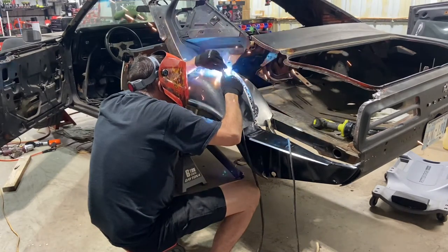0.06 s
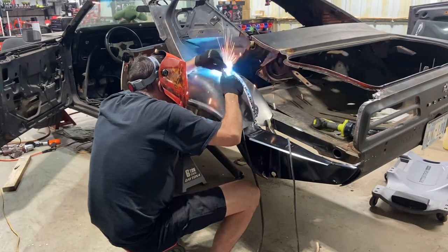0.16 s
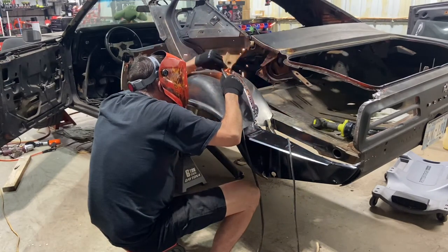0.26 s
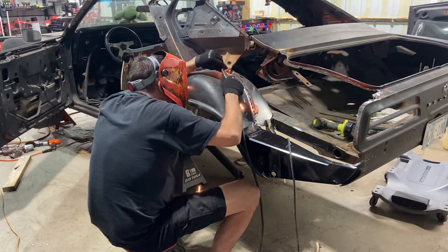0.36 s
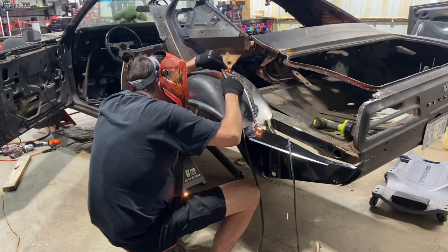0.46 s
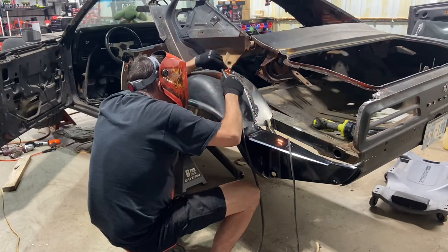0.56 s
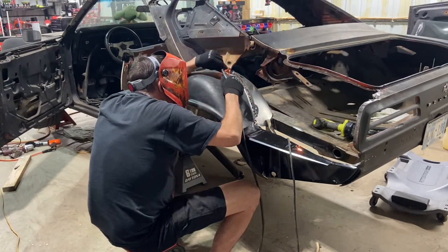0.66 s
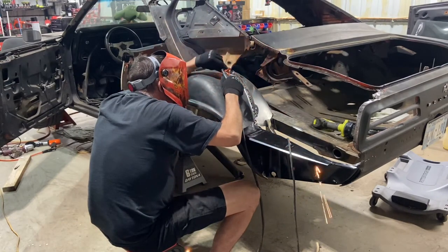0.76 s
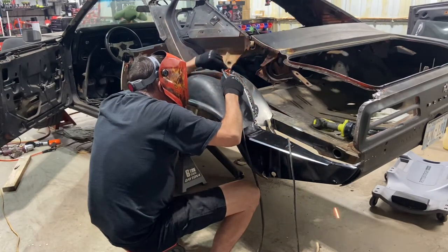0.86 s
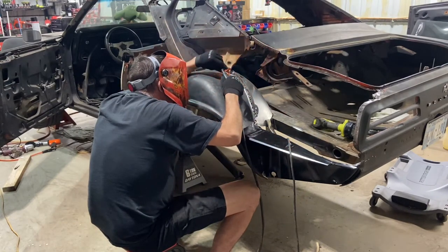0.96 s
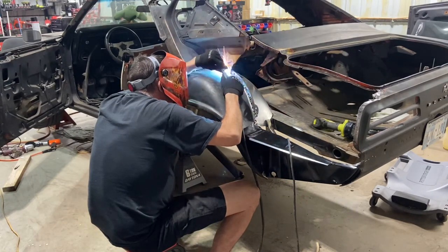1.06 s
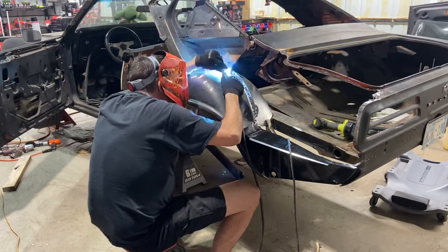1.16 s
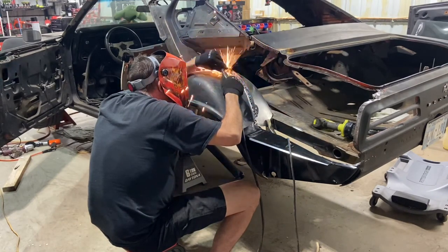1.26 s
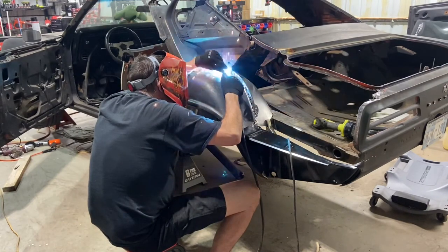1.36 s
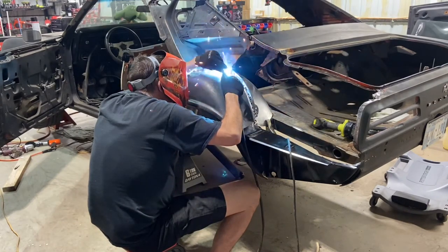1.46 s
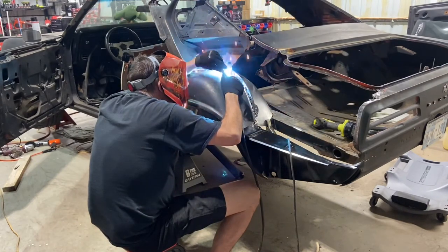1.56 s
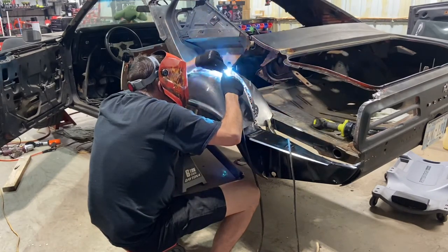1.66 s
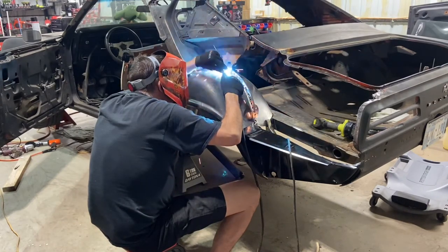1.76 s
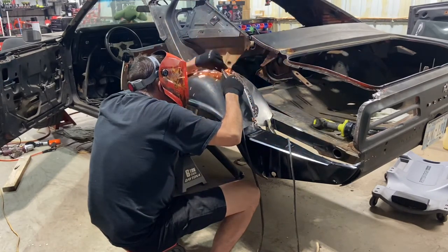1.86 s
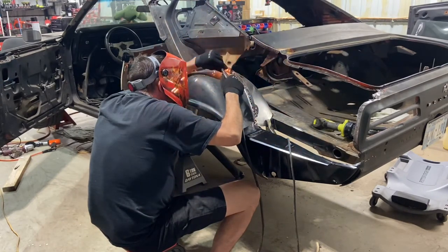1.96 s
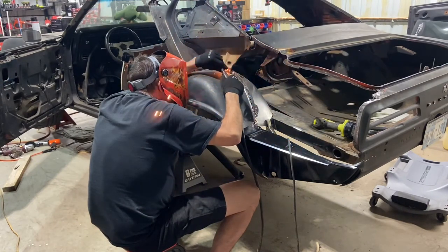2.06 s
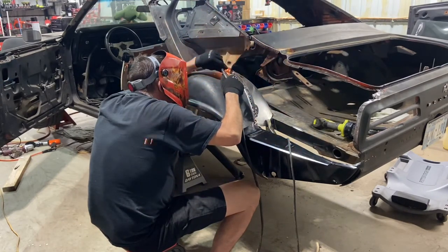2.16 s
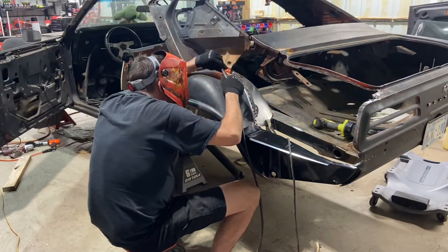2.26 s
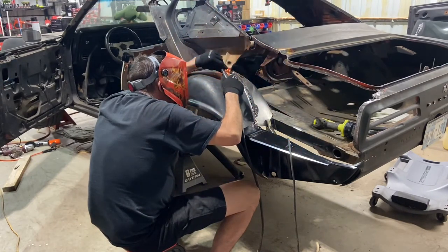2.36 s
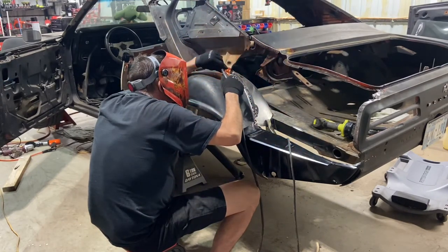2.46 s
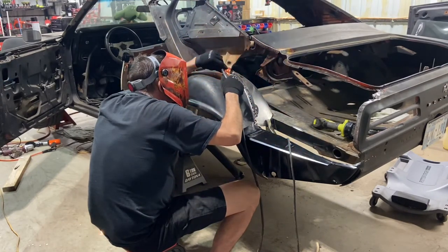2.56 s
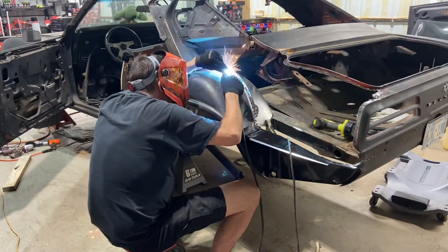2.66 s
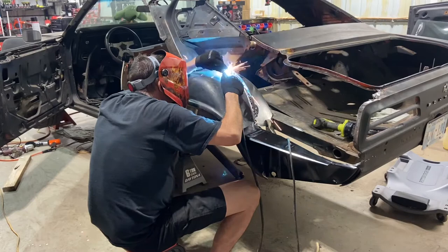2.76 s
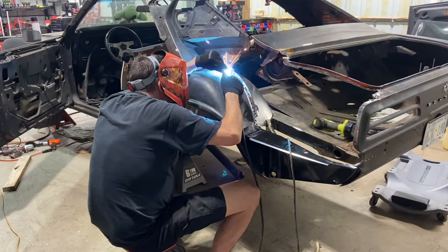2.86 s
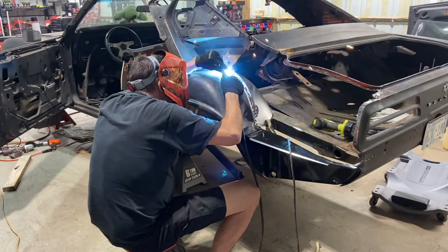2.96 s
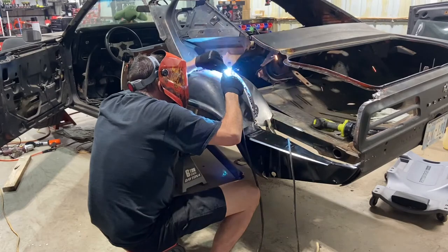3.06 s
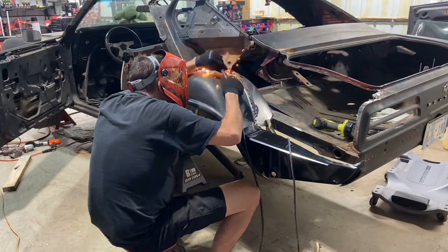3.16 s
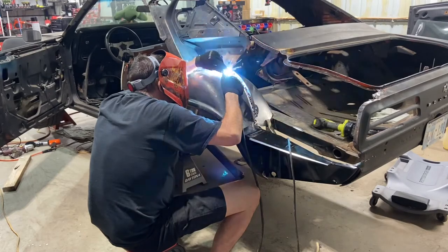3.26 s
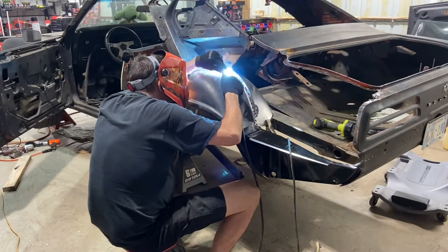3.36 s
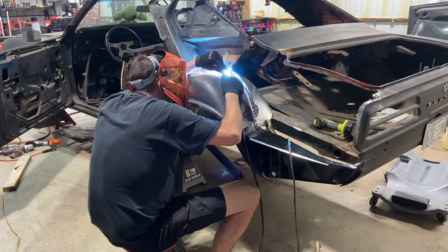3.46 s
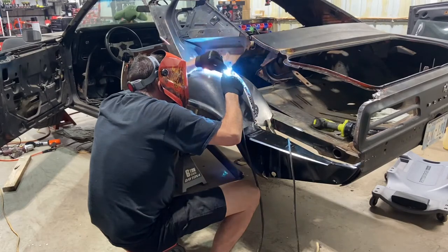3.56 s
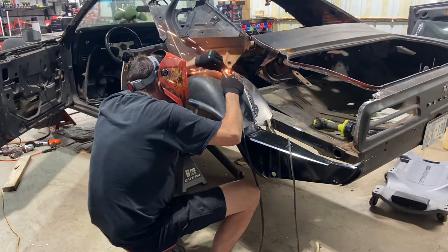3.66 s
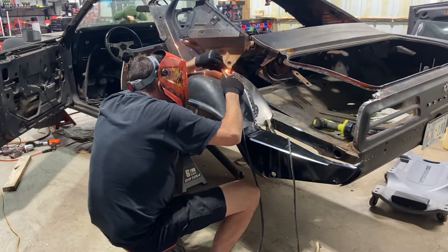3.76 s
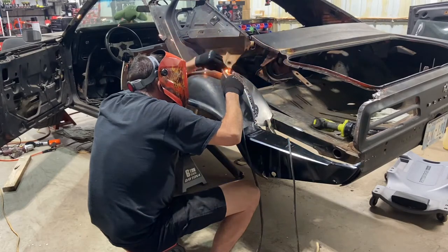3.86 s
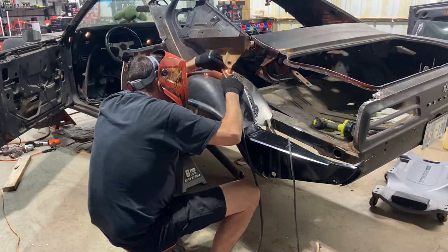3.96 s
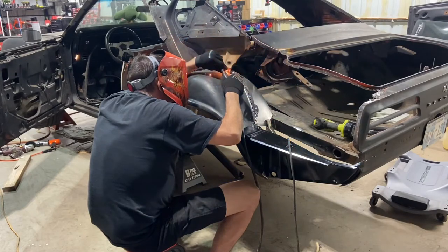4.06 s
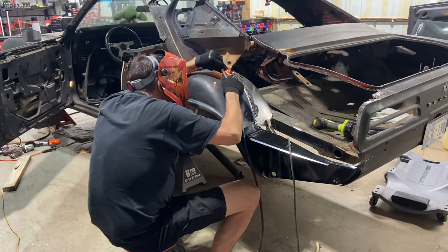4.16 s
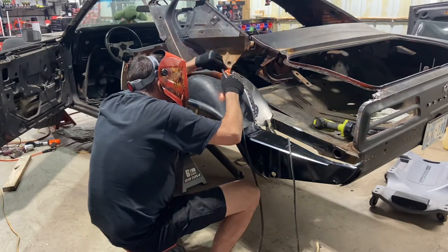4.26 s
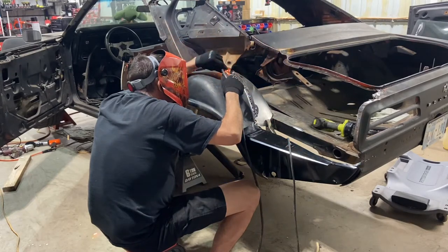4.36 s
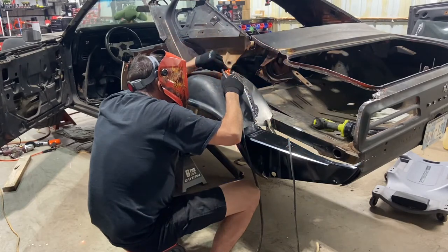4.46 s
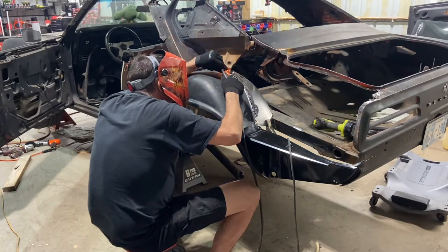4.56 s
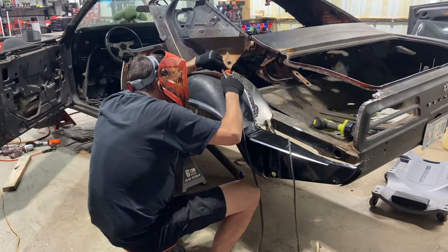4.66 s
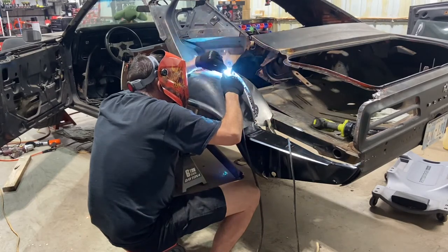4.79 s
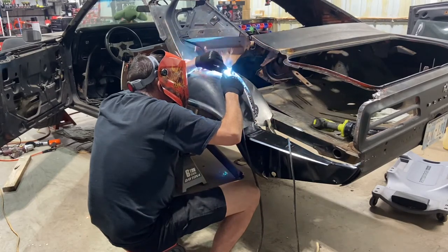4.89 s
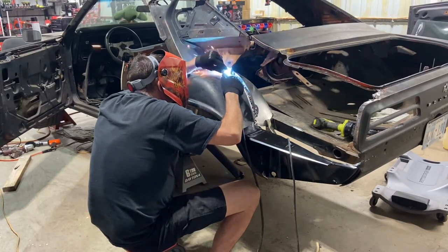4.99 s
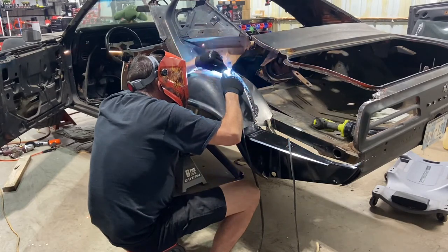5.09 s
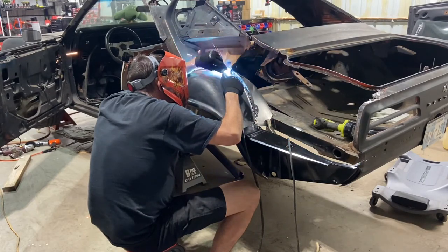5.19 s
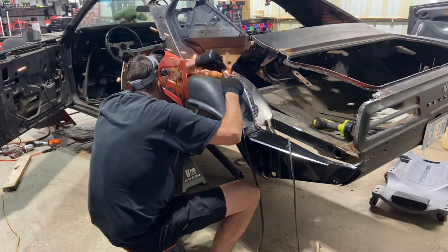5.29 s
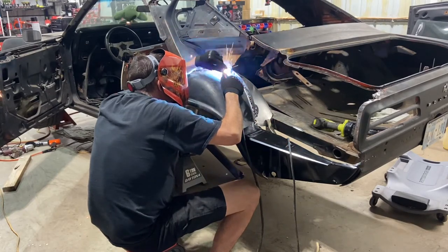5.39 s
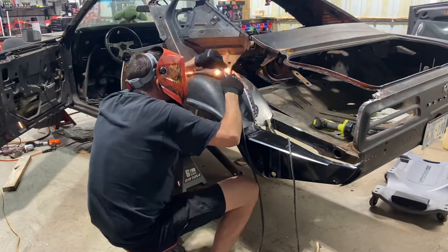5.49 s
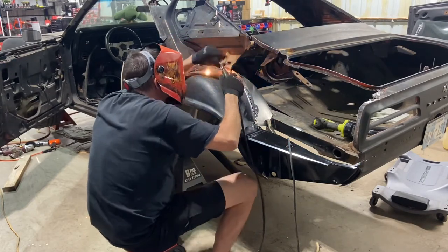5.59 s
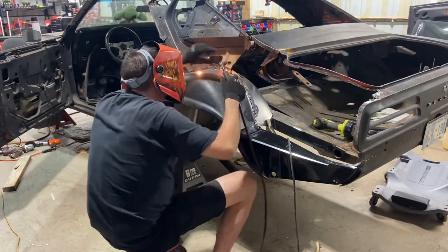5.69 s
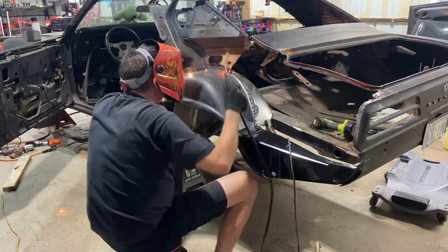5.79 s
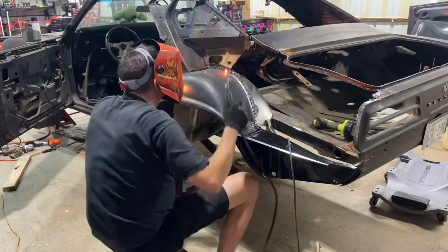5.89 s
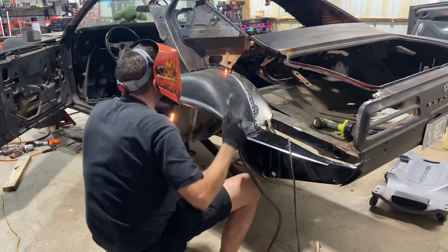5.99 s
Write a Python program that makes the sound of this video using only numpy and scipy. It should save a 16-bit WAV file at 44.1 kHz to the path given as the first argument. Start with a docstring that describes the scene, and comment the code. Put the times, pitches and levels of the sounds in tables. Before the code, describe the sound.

A large, live metal workshop heard from about two metres, with a steady low fan drone around 250 Hz, soft air rush and faint transformer hum throughout. At 0 s a weld is just ending, its echo decaying; a single snap at 0.15 s. Quiet hum until a short squeaky tick at 1.0 s and a puff of gas, then from 1.05 to 1.8 s a harsh buzzing crackle, about 75 snaps a second, with uneven loud pops, fizz and steel thuds. The hall tail fades. Another tick at 2.57 s starts a longer, fiercer weld from 2.63 to 3.57 s, the panel booming. A faint pop near 4 s. A third tick at 4.69 s, weld from 4.73 to 5.28 s with heavy low thuds, then a brief zap at 5.36 to 5.4 s. Echo dies away; from 5.7 s cloth rubs softly, with light knocks at 5.75 and 5.95 s, ending around 6 s.

```python
"""Short MIG welds on a bare car body in a steel-walled workshop, heard from about two metres.
The wire strikes, then shorts and bursts some 75 times a second: each burst cracks, shakes the sheet steel and fills the hall.
Spatter fizzes between the bursts and the hot panel thuds; a cooling fan, slowing under each weld, and the transformer hum throughout.
The welder shifts position at the end."""
import sys
import numpy as np
from scipy import signal
from scipy.fft import rfft, irfft, next_fast_len
from scipy.io import wavfile

SR = 44100
rng = np.random.default_rng(int(sys.argv[2]) if len(sys.argv) > 2 else 0)


def pcm_store(signal):
    """Save signal as 16-bit PCM."""
    levels = np.round(np.clip(np.atleast_2d(signal), -1, 1) * 32767)
    wavfile.write(sys.argv[1], SR, levels.astype(np.int16).T)


N = 265910

# loud pops, where the wire stubs and blows clear: (s, level dB)
POPS = [(0.1519, -6.5), (1.0578, -6), (1.0795, -11), (1.1056, -7), (1.1366, -15), (1.1676, -11.5), (1.1797, -8),
        (1.2121, -13), (1.2352, -13.5), (1.2491, -3), (1.2985, -5.5),
        (1.333, -7), (1.3457, -5), (1.3581, -5), (1.3866, -8), (1.4645, -10), (1.5081, -12.5),
        (1.5296, -10.5), (1.566, -14), (1.5799, -7), (1.5984, -10.5),
        (1.6135, -3.5), (1.6343, -7), (1.6489, -5), (1.711, -7), (1.724, -7), (1.743, -4.5), (1.7652, -6),
        (1.7844, -12), (1.799, -13), (2.578, -11.5), (2.646, -5),
        (2.6571, -5.5), (2.6802, -3), (2.7024, -3), (2.7161, -8), (2.7523, -10), (2.7768, -7), (2.79, -7),
        (2.805, -9.5), (2.819, -5), (2.8985, -12), (3.0073, -11), (3.0205, -9.5), (3.0375, -14.5),
        (3.0829, -6.5), (3.1109, -6.5), (3.1397, -7.5), (3.1718, -6.5),
        (3.217, -8), (3.2458, -9), (3.2564, -6.5), (3.309, -8.5), (3.3325, -10), (3.3441, -8), (3.3561, -6),
        (3.4015, -8), (3.4281, -8), (3.4478, -9),
        (3.465, -7.5), (3.4748, -6), (3.513, -10), (3.5255, -7.5), (3.5385, -9), (3.5771, -9.5), (3.6102, -9),
        (3.9878, -12.5), (4.697, -4), (4.7375, -8), (4.7634, -7.5), (4.7784, -6.5), (4.7916, -7.5),
        (4.803, -10.5), (4.814, -10), (4.8271, -12), (4.8398, -7), (4.8534, -11), (4.869, -7.5),
        (4.8927, -7), (4.9047, -10.5), (4.9179, -9), (4.9314, -11.5), (4.9589, -8.5), (4.9725, -6.5),
        (5.0071, -6.5), (5.0219, -9), (5.0732, -11.5), (5.0912, -14), (5.108, -9),
        (5.123, -8), (5.142, -8.5), (5.1763, -6.5), (5.2459, -11), (5.2788, -9.5), (5.3553, -6), (5.3916, -7.5)]
# the cold wire stubs on the steel before each arc: (s, level dB, build-up of the skid s, pitch of its lower squeak Hz, lower squeak dB, upper squeak dB, surge of gas dB)
STRIKES = [(1.0082, 1.5, 0.0015, 3750, -2, -4, 3.5), (2.5737, 3, 0.0016, 4180, -12, -1.5, 6), (4.6908, 0, .003, 3380, -2.5, -6, 6)]
# the arc burns, for a whole weld or a brief dab: (catches s, goes out s, level dB, shaking of the panel dB)
WELDS = [(-.5, 0.039, 4, -4), (0.146, 0.17, -2.5, 2.5), (1.05, 1.798, -4.8, 0), (2.627, 3.571, -0.5, 1.5), (4.732, 5.278, 0.6, 0.5), (5.36, 5.404, 4, 1)]
# light knocks of the torch and the welder's body: (s, level dB)
KNOCKS = [(5.745, -30), (5.935, -24), (5.972, -21)]
# colours: (Hz, dB per Hz)
CRACK = [(200, -19), (600, -28), (1000, -12.5), (1700, -16.5), (2100, -1.5), (2600, -6), (3300, -2.5), (4700, -1), (5800, -3), (7200, 0.76), (10500, -1.5), (13500, -1.5), (15500, -5.5)]
HALL = [(150, -2), (500, -4.5), (1000, 3), (1500, 3), (2600, 1), (4500, -0.5), (7000, 2.5), (9000, -2.5), (11000, 3), (13500, 0.5), (15500, -1)]
KNOCK = [(100, -17), (450, 10), (900, -5.5), (2000, -5), (5000, -10.5), (14000, -23)]
SHOP = [(25, -33.5), (45, -18), (70, -1), (105, -9.5), (145, -6), (170, 2.5), (210, 1.5), (236, 7.5), (259, -2.5), (277, 6), (300, -4), (340, -9.5), (420, -13), (600, -14), (1200, -17.5), (2500, -24.5), (6000, -36), (9000, -42), (15000, -65)]
# reverberation of the hall: (Hz, t60 s)
HALL_T60 = [(100, 0.65), (500, 1.24), (1400, 0.98), (3700, 1.33), (7000, 1.03), (10000, 0.57), (15000, 0.36)]
# the sheet steel: (Hz, t60 s, dB)
PANEL_FLEX = [(55.7, 0.2, -15.5), (72.9, 0.38, 0), (124, 0.68, 1), (166.2, 0.33, 3.5), (195, 0.13, 5), (231, 0.2, 4.5), (280.5, 0.19, 2), (360.2, 0.3, -2.5), (408, 0.11, -18.5), (494, 0.05, -24), (605, 0.12, -4)]
PANEL_RING = [(716, 0.078, -23.5), (873, 0.089, -6.5), (968, 0.36, -9.5), (1015, 0.19, -9.5), (1160, 0.03, -10.5), (1396, 0.023, -2.5), (1493, 0.06, -4), (2130, 0.05, -7.5), (2304, 0.062, 1), (3000, 0.26, -21.5), (3190, 0.12, -6)]
# the ring of the struck wire: (Hz, t60 s, dB)
WIRE_RING = [(1480, .03, -4), (2272, 0.03, -12), (3630, 0.007, 0), (3760, 0.04, -1), (4300, 0.006, 1), (5250, .006, 1), (6890, .008, 0)]  # fixed
# tones of the fan: (multiple of the blade rate, dB rms)
FAN = [(1, -43), (2, -57.5), (3, -67.5), (5, -65.5), (6, -70.5)]
# hum of the transformer: mains frequency (Hz) and level (dB rms)
MAINS_HZ = 60  # fixed
HUM_DB = -63.5

# the fan slows while the arc loads the supply: (blade rate at rest Hz, sag under load Hz, lag of the rotor s)
FAN_HZ, FAN_SAG_HZ, FAN_LAG_S = 249.4, 3.7, .13  # fixed
LEAD = SR // 2  # fixed
M = N + 2 * SR  # fixed
TIME = (np.arange(M) - LEAD) / SR
PORT_LAG = 10  # fixed
TOP_HZ = 16000  # fixed
# the welder leans back, clothes and glove rubbing: (s, level dB)
SHUFFLE = [(5.701, -93), (5.75, -75), (5.79, -65), (5.90, -61), (5.94, -59), (5.98, -60), (6.04, -48.5)]
# the heated panel buckles with a deep thud: (s, level dB, length of the push s)
THUDS = [(1.084, -48, .003), (1.37, -47, .004), (1.69, -42, 0.0044), (1.76, -43, 0.0037), (1.821, -41, 0.0032), (2.656, -43, 0.0032), (2.799, -45, .008), (2.889, -49, 0.0045), (3.187, -42, 0.0043), (3.219, -40, 0.0048), (3.259, -38, 0.0028),
         (3.354, -33.5, 0.0082), (3.452, -46, 0.0058), (4.733, -39, 0.0031), (4.766, -38.5, .004), (4.816, -34, 0.0041), (4.869, -34, 0.0072), (4.917, -40, 0.0031), (4.989, -35, 0.0089)]
# modes of the buckling panel: (Hz, t60 s, dB)
BUCKLE = [(48.3, 0.089, -1), (64, 0.066, 3.5), (86, 0.053, 5.5), (122.6, 0.057, 17), (164, .035, 15)]
# strength of the arc through the three long welds: (s, dB)
ARC_STRENGTH = [(1.07, -28.5), (1.15, -24.5), (1.22, -22.5), (1.259, -22.5), (1.36, -21), (1.47, -27),
                (1.56, -26), (1.629, -26.5), (1.79, -23), (2.66, -27), (2.82, -26.5), (2.94, -28.5),
                (3.009, -23.5), (3.06, -32.0), (3.2, -21), (3.3, -27.5), (3.48, -25.5), (3.591, -28),
                (4.75, -23), (4.78, -22.5), (4.9, -29), (5.01, -26), (5.06, -33), (5.13, -30.5),
                (5.269, -32)]
# the arc catches and dies quickly; each strike gives a short flare before it
CATCH_S, DIE_S, FLARE_T60 = 0.011, 0.027, 0.15
# fizz and shaking at full strength and their dB per dB of strength; fizz in the flare
FIZZ_DB, FIZZ_SWING, FIZZ_FLARE_DB = -25.5, 1.07, -24
# the wire's dipping cycle: (rate Hz, unevenness in cycles, spread of the bursts dB, level of the snap that ends each short dB)
SHORTS_HZ, SHORTS_JITTER, SHORTS_SCATTER_DB, SNAP_DB = 78, .15, 3.5, 22.5  # fixed
# air blown from the fan's vent, off to one side: (Hz, dB per Hz)
VENT = [(250, -11.5), (380, -3.5), (500, -10), (620, 8), (760, 7), (830, -4), (950, 5), (1250, -15.5), (1600, -33.5), (2200, -30), (5000, -48)]
VENT_DB, VENT_LAG_S = -50, 0.00063
SHAKE_DB, SHAKE_SWING = -28, 0.8
CEILING = .88  # fixed
# a loud pop is fuller than the fizz: (corner of its extra body Hz, level of that body dB, evenness of its colour 0-1)
POP_BODY_HZ, POP_BODY_DB, POP_EVEN = 3000, -2, .55  # fixed
# the loudest pops blow the pool apart and spit on: (t60 s, level dB, dB per dB of the pop)
BLOW_T60, BLOW_DB, BLOW_SWING = .008, 1, 1.8  # fixed
# the skid of the cold wire: (fall s, level of the squeak dB, pitch of the upper squeak Hz)
SKID_FALL_S, SQUEAK_DB, SQUEAK_HZ = .0028, -22, 5280  # fixed
# resonance of the gas nozzle: (centre Hz, width Hz)
NOZZLE_HZ, NOZZLE_WIDTH_HZ = 1505, 270  # fixed


def undb(db):
    """Decibels to gain."""
    return 10 ** (np.asarray(db) / 20)


def unit(x):
    """Scale a response to unit energy."""
    return x / np.sqrt(np.sum(x ** 2, axis=-1, keepdims=True))


def along(points, hz):
    """Read (Hz, value) points on a log-frequency axis."""
    f, v = np.transpose(points)
    return np.interp(np.log(np.maximum(hz, 1)), np.log(f), v)


def shaped(x, gain):
    """Filter by a gain that is a function of frequency."""
    size = next_fast_len(x.shape[-1])
    return irfft(rfft(x, size) * gain(np.arange(size // 2 + 1) * SR / size), size)[..., :x.shape[-1]]


def click(points, size=1024):
    """The sharpest causal pulse with a given colour."""
    cepstrum = irfft(np.log(undb(along(points, np.arange(size // 2 + 1) * SR / size))))
    cepstrum[1:size // 2] *= 2
    cepstrum[size // 2 + 1:] = 0
    return unit(irfft(np.exp(rfft(cepstrum))))


def through(x, response):
    """Pass a sound through a one- or two-channel response."""
    return signal.fftconvolve(np.atleast_2d(x), np.atleast_2d(response), axes=-1)[:, :M]


def fade(t, t60):
    """Exponential decay, 60 dB in t60."""
    return np.exp(-np.log(1000) * t / t60)


def ring(modes):
    """Response of damped modes; each level is the mode's energy."""
    t = np.arange(SR // 2) / SR
    return unit(sum(undb(db) * unit(np.sin(2 * np.pi * hz * t) * fade(t, t60)) for hz, t60, db in modes))


def bursts(events, t60, rough, even=0, size=512):
    """A spike for each (s, dB) row, trailed by its own short spit of noise; even (0-1) flattens each burst's colour."""
    out, spit = np.zeros(M), rough * unit(rng.standard_normal((len(events), size)) * fade(np.arange(size) / SR, t60))
    spit[:, 0] = 1
    colour = rfft(np.pad(spit, ((0, 0), (size, 0))))
    for (s, db), shape in zip(events, unit(irfft(colour / np.abs(colour) ** even))):
        start = LEAD + int(s * SR)
        out[start - size:start + size] += undb(db) * shape
    return out


def diffuse(size, alike_hz):
    """Noise from all directions: the two sides agree in the bass only."""
    mid, side = rng.standard_normal((2, size))
    likeness = lambda f: np.clip(0.25 + 0.76 / (1 + (f / alike_hz) ** 2), 0, 1)
    mid, side = shaped(mid, lambda f: np.sqrt(1 + likeness(f))), shaped(side, lambda f: np.sqrt(1 - likeness(f)))
    return np.array([mid + side, mid - side]) / np.sqrt(2)


def burning():
    """Gains of fizz and of panel shaking: both follow the arc's strength while it burns; the fizz also flares at each strike."""
    s, db = np.transpose(ARC_STRENGTH)
    strength = np.interp(TIME, s, db - db.max())
    fizz = shake = 0
    for on, off, level_db, shake_db in WELDS:
        lit = np.clip(np.minimum((TIME - on) / CATCH_S, 1 + (off - TIME) / DIE_S), 0, 1)
        fizz = fizz + lit * undb(FIZZ_DB + level_db + FIZZ_SWING * strength)
        shake = shake + lit * undb(SHAKE_DB + shake_db + SHAKE_SWING * strength)
    flare = sum((TIME > s) * fade(np.abs(TIME - s), FLARE_T60) for s, *_ in STRIKES)
    return fizz + undb(FIZZ_FLARE_DB) * flare, shake


def shorts(count=700):
    """The wire dips into the pool at an uneven rate, and the cycle starts afresh at each loud pop: rows (s, dB)."""
    chance = rng.standard_normal((count, 2))
    restarts = np.array([TIME[0], *np.array(POPS)[:, 0], N / SR])
    cycles = np.cumsum(np.maximum(np.round(np.diff(restarts, prepend=TIME[0]) * SHORTS_HZ), 1))
    dips = np.setdiff1d(np.arange(1, min(cycles[-1], count)), cycles).astype(int)
    s = np.interp(dips + SHORTS_JITTER * chance[dips, 0], cycles, restarts)
    return np.column_stack([s, SHORTS_SCATTER_DB * np.minimum(chance[dips, 1], 1)])


def spatter(rate_hz=2500, spread_db=7.0, hiss=0.23):
    """Tiny droplets crackle over the hiss of the plasma."""
    drops = (rng.random(M) < rate_hz / SR) * undb(spread_db * np.minimum(rng.exponential(size=M), 5)) * rng.choice([-1, 1], M)
    return drops / drops.std() + hiss * rng.standard_normal(M)


def nearby(scatter_t60=0.024, echo_t60=0.024):
    """Direct path, scatter in the wheel arch, then echoes from boot lid, floor and cabin."""
    t = np.arange(SR // 10) / SR
    scatter_db = -6  # fixed
    response = undb(scatter_db) * unit(diffuse(len(t), 300) * fade(t, scatter_t60))
    for delay, db in [(.0058, -10), (.0118, -8), (.0135, -28.5), (.0215, -14), (.0265, -14.5)]:
        response += undb(db) * unit(diffuse(len(t), 300) * (t > delay) * fade(np.abs(t - delay), echo_t60))
    # the direct sound reaches the left side one sample sooner
    response[0, 0] += undb(2.5)
    response[1, 1] += undb(-1.5)
    return response


def hall(build_s=0.015):
    """A tail that builds up, then dies at its own pace in each octave."""
    t = np.arange(SR * 3 // 2) / SR
    noise, centres = diffuse(len(t), 280), np.geomspace(125, 16000, num=8)  # fixed
    tail = 0
    for hz, share in zip(centres, np.eye(len(centres))):
        band = shaped(noise, lambda f: along(np.column_stack([centres, share]), f) * undb(along(HALL, f)))
        tail = tail + band * fade(t, along(HALL_T60, hz))
    return unit(tail * (1 - np.exp(-t / build_s)))


def arc(pop_db=7.0, pop_lag_s=.0007, short_db=12.0, fizz_db=-5, roar_db=-14.0, ring_db=-17, flex_db=22, kick_db=-15, thud_db=33, lowest_hz=48):
    """Bursts and spatter crack in the air and ring the steel; the wire's pushes flex the whole panel."""
    cycle, (heat, force) = shorts(), burning()
    pops = undb(pop_db) * bursts([(s + pop_lag_s, db) for s, db in POPS], t60=0.0026, rough=1.29, even=POP_EVEN)
    pops = pops + undb(POP_BODY_DB) * signal.lfilter(*signal.butter(1, POP_BODY_HZ, fs=SR), pops)
    pops = pops + undb(BLOW_DB) * bursts([(s + pop_lag_s + BLOW_T60 / 10, BLOW_SWING * db) for s, db in POPS], t60=BLOW_T60, rough=5.3)
    # each short ends in a sharp snap and a longer spit
    crackle = undb(SNAP_DB) * bursts(cycle, t60=0.0025, rough=1.0) + undb(short_db) * bursts(cycle, t60=0.0094, rough=3.3)
    sparks = pops + heat * (crackle + undb(fizz_db) * spatter())
    crack = through(dispersed(sparks), click(CRACK)) + undb(ring_db) * through(sparks, ring(PANEL_RING))
    # the plasma jet roars under the crackle, harder as the arc presses on the pool
    roar = shaped(rng.standard_normal(M), lambda f: f ** 2 / (1 + (f / 250) ** 2) / (1 + (f / 1700) ** 2))
    crack = crack + undb(roar_db) * (heat + force) / 2 * roar / roar.std()
    pushes = undb(flex_db) * force * bursts(cycle, t60=0.013, rough=0.11) + undb(kick_db) * bursts(POPS, t60=.004, rough=0.35)
    thuds = undb(thud_db) * buckling()
    flex = through(pushes, ring(PANEL_FLEX)) + thuds
    # air slips round the open panel's edges, so its slowest motion is not radiated
    return crack, signal.sosfilt(signal.butter(6, lowest_hz, "high", fs=SR, output="sos"), flex)  # fixed


def strikes(ring_db=-27, spit_db=-28.0, squeak_width_hz=200):
    """The wire skids on the cold steel for a few milliseconds: it squeaks at two unsteady pitches, rings and spits."""
    skids = squeaks = 0
    slip = np.cumsum(rng.standard_normal((2, M)), axis=1) * np.sqrt(2 * np.pi * squeak_width_hz / SR)
    for s, db, rise_s, low_hz, low_db, high_db, _ in STRIKES:
        age = TIME - s
        skid = undb(db) * np.exp(np.maximum(np.minimum(age / rise_s, -age / SKID_FALL_S), -20))
        tones = undb(low_db) * np.sin(2 * np.pi * low_hz * age + slip[0]) + undb(high_db) * np.sin(2 * np.pi * SQUEAK_HZ * age + slip[1])
        skids, squeaks = skids + skid, squeaks + skid * tones
    scrape = skids * rng.standard_normal(M)
    return undb(SQUEAK_DB) * squeaks + undb(ring_db) * through(scrape, ring(WIRE_RING)), undb(spit_db) * through(scrape, click(CRACK))


def fan(air_db=-43.5, waver=0.054, drift=0.11):
    """Blade tones that sag during each weld and waver slightly in the turbulent intake, over the rush of air in the shop."""
    def wander(hz):
        w = shaped(rng.standard_normal(M), lambda f: 1 / (1 + (f / hz) ** 2))
        return w / w.std()
    turn = 2 * np.pi * np.cumsum(FAN_HZ - FAN_SAG_HZ * load(FAN_LAG_S)) / SR + drift * wander(2)  # fixed
    # standing waves put the two sides out of step
    sides = np.array([[-.45], [.45]])
    tones = (1 + waver * wander(7.2)) * sum(np.sqrt(2) * undb(db) * np.sin(k * turn + sides) for k, db in FAN)
    air = shaped(diffuse(M, 230), lambda f: undb(along(SHOP, f)))
    return tones * undb([[-.3], [.3]]) + undb(air_db) * air / air.std()


def dispersed(x, lag_s=0.000462, corner_hz=5000):
    """Sound carried along sheet steel: the treble arrives first, so each click is a tiny falling chirp."""
    return shaped(x, lambda f: np.exp(-2j * np.pi * lag_s * corner_hz * np.arctan(f / corner_hz)))


def gas(surge_db=-49, steady_db=-64, rise_s=0.063, hiss_db=-1):
    """Shielding gas stored in the hose surges out at each trigger pull, then flows evenly; it sounds the nozzle like a pipe."""
    surge = 0
    for s, *_, db in STRIKES:
        age = np.maximum(TIME - s, 0) / rise_s
        surge = surge + undb(db) * (age * np.exp(1 - age)) ** 2
    flow = rng.standard_normal(M)
    hoot = shaped(flow, lambda f: 1 / (1 + 2j * (f - NOZZLE_HZ) / NOZZLE_WIDTH_HZ) ** 2)
    rush = shaped(flow, lambda f: f / (1 + (f / 900) ** 2))
    return (undb(surge_db) * surge + undb(steady_db) * load(lag_s=0.017)) * (hoot / hoot.std() + undb(hiss_db) * rush / rush.std())


def movement():
    """Cloth rubs in tiny slips and the torch knocks lightly as the welder leans back."""
    s, db = np.transpose(SHUFFLE)
    rubbing = np.interp(TIME, s, undb(db), 0, 0) * spatter(rate_hz=590, spread_db=4.5, hiss=0.91)
    return through(rubbing + bursts(KNOCKS, t60=0.064, rough=2.8), click(KNOCK))


def vent():
    """The fan's exhaust rushes from the right, so it reaches the left side a moment later."""
    air = shaped(rng.standard_normal(M), lambda f: undb(along(VENT, f)))
    late = shaped(air, lambda f: np.exp(-2j * np.pi * f * VENT_LAG_S))
    return undb(VENT_DB) * np.array([late, air]) / air.std()


def transformer():
    """The welder's transformer hums faintly at twice the mains frequency."""
    return np.sqrt(2) * undb(HUM_DB) * np.sin(4 * np.pi * MAINS_HZ * TIME)


def buckling():
    """Each thud is one soft push on the panel: the longer the push, the deeper the sound."""
    pushes = np.zeros(M)
    for s, db, length in THUDS:
        push = np.sin(np.pi * np.clip((TIME - s) / length + .5, 0, 1)) ** 2
        pushes += undb(db) * push / push.sum()
    return through(pushes, ring(BUCKLE))


def load(lag_s):
    """0 at rest, 1 while the arc burns, followed with a lag."""
    burns = sum((TIME > on) * (TIME < off) for on, off, _, _ in WELDS)
    step = 1 / (lag_s * SR)
    return signal.lfilter([step], [1, step - 1], burns)


def scene(hall_db=-2, flex_hall_db=-5, flex_lag_s=0.00049):
    """Arc, strikes, gas and movement sound through the car body and the hall, over the fan."""
    crack, flex = arc()
    squeak, spit = strikes()
    near = crack + spit + gas() + movement()
    # the squeak is beamed out of the wheel arch, so little of it fills the hall
    squeak_hall_db = -10  # fixed
    tail = through(undb(hall_db) * near + undb(squeak_hall_db) * squeak + undb(flex_hall_db) * flex, hall())
    # the long panel stretches off to the right, so its boom reaches the left side later and weaker
    boom = np.vstack([undb(-0.5) * shaped(flex, lambda f: np.exp(-2j * np.pi * f * flex_lag_s)), undb(3.0) * flex])
    return (through(near + squeak, nearby()) + boom + tail + fan() + transformer() + vent())[:, LEAD:LEAD + N]


def record(dry, cross_hz=7900):
    """In the top octave both channels carry one signal, the left slightly late and inverted; peaks are rounded, the top is cut."""
    top = lambda f: 1 / (1 + (cross_hz / np.maximum(f, 1)) ** 40)  # fixed
    treble = shaped(dry[0], lambda f: np.sqrt(top(f)))
    out = shaped(dry, lambda f: np.sqrt(1 - top(f))) + np.array([-np.roll(treble, PORT_LAG // 2), np.roll(treble, -PORT_LAG // 2)])
    return signal.sosfilt(signal.ellip(10, .2, 80, TOP_HZ, fs=SR, output="sos"), CEILING * np.tanh(out / CEILING))


dry = scene()
out = record(dry)
pcm_store(out)
```